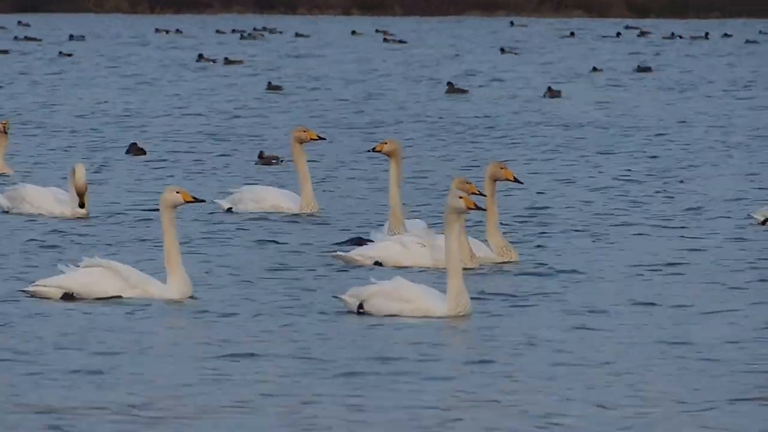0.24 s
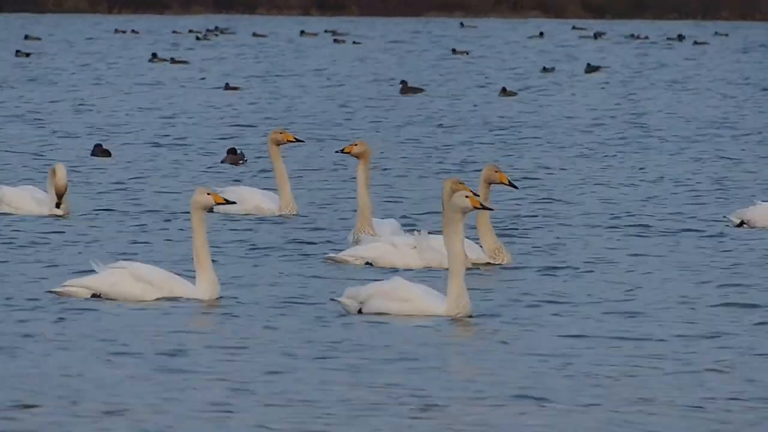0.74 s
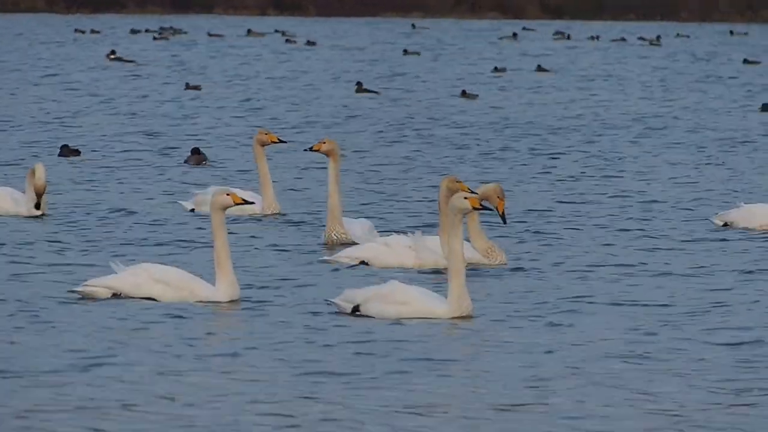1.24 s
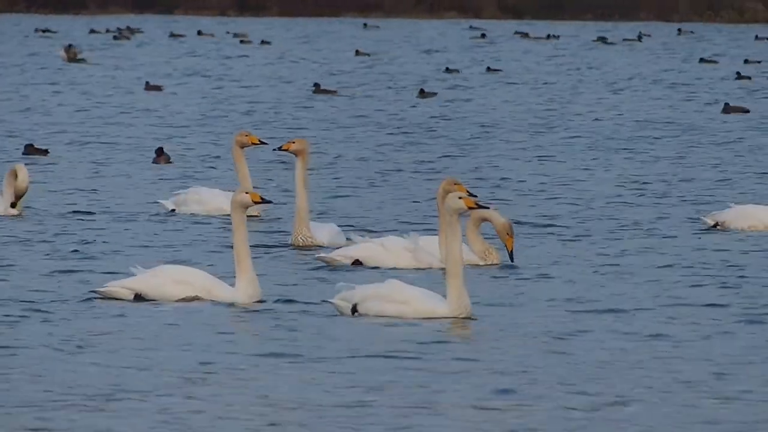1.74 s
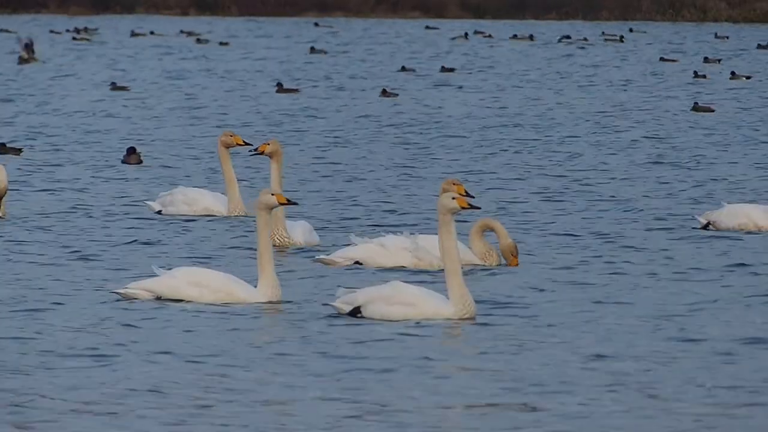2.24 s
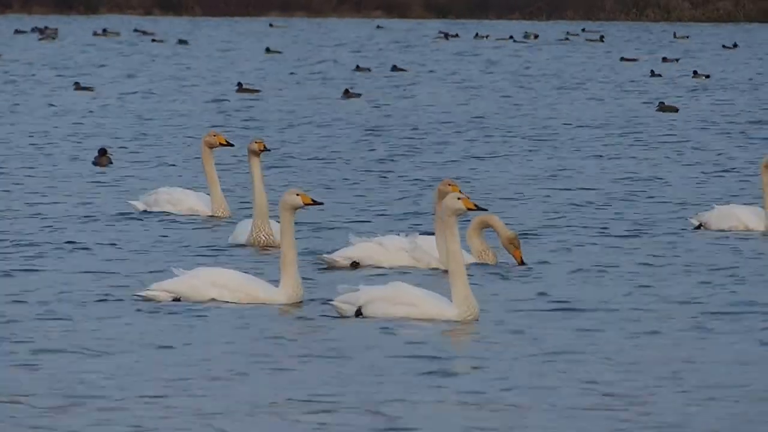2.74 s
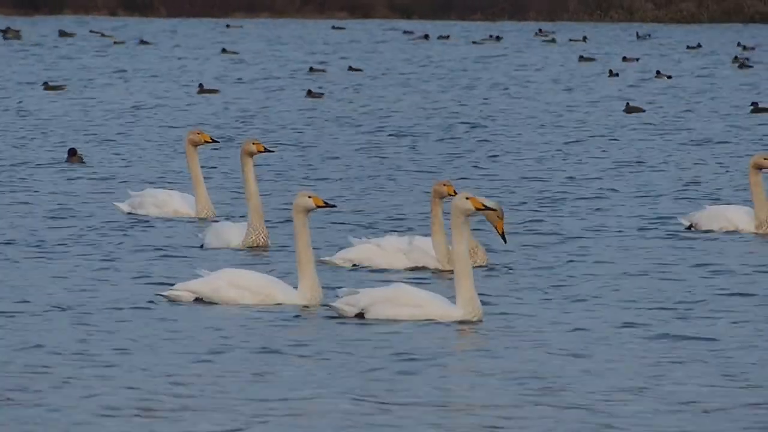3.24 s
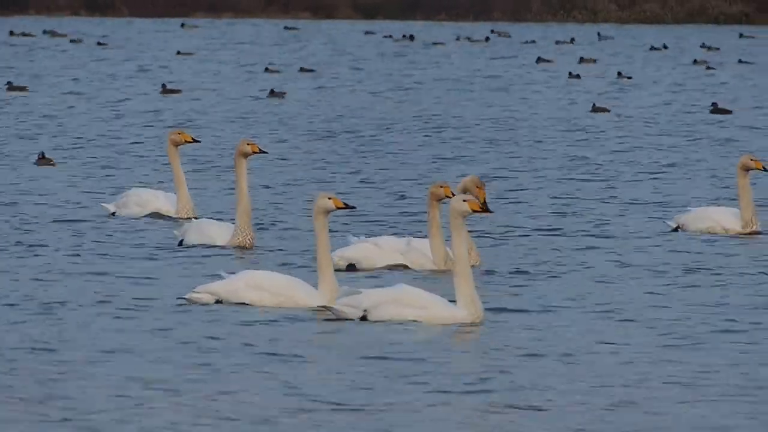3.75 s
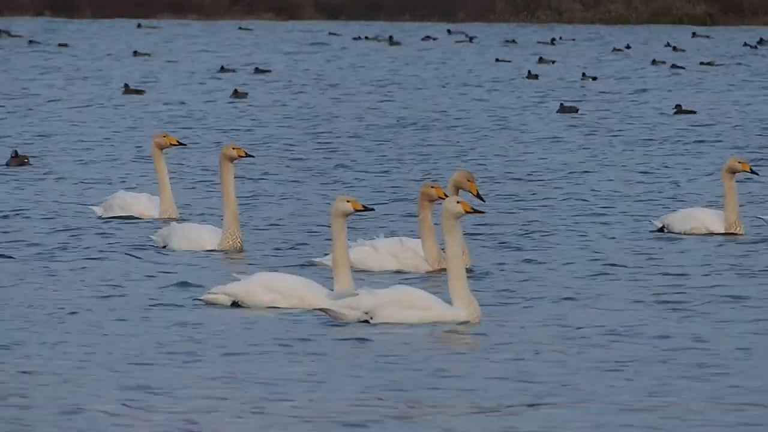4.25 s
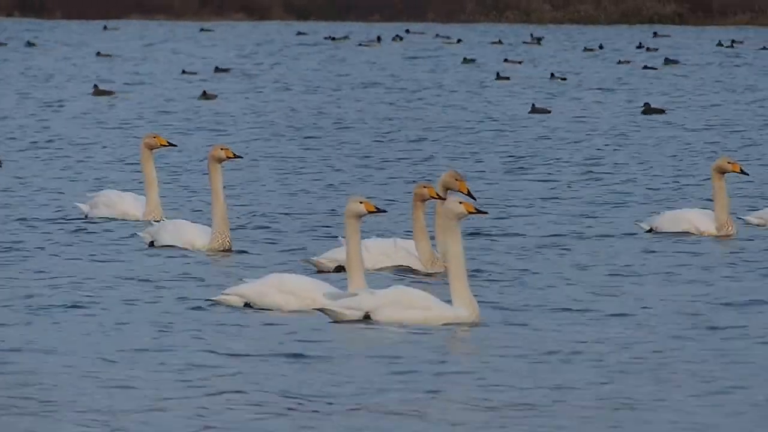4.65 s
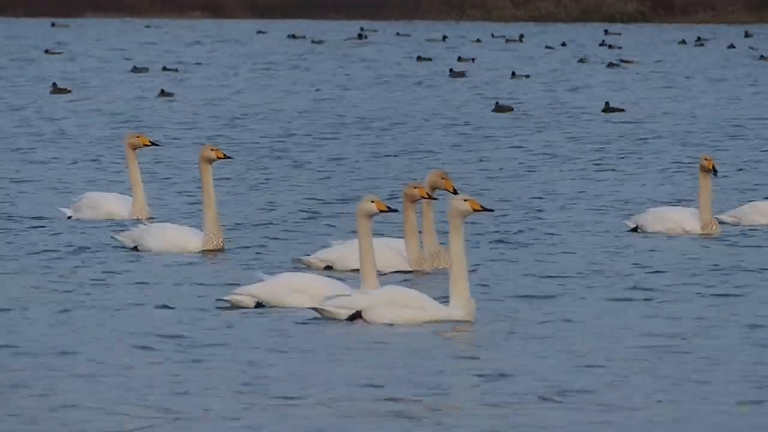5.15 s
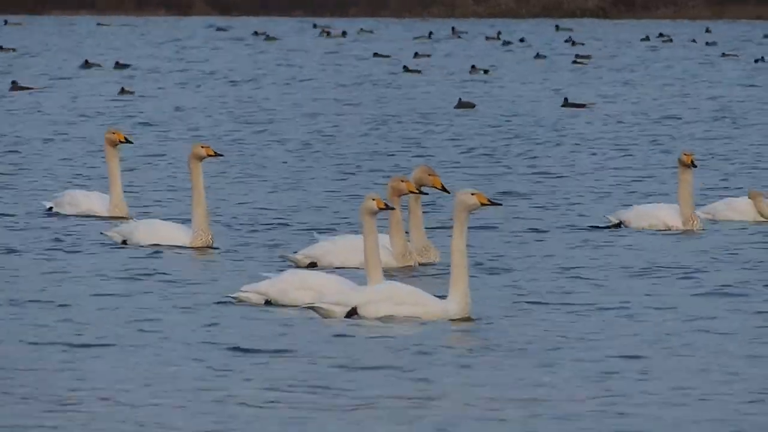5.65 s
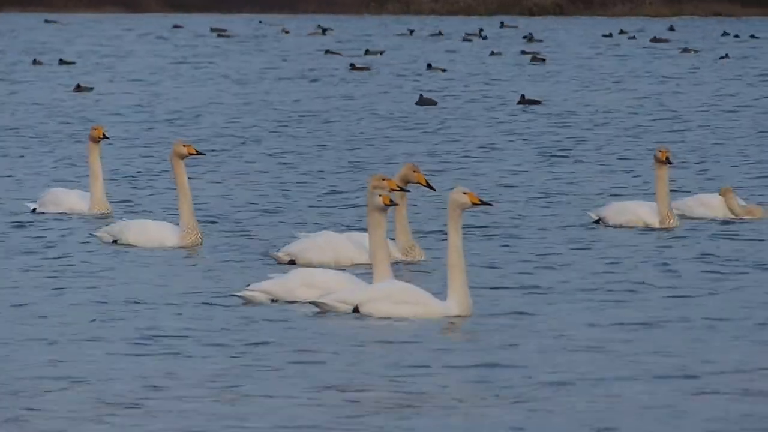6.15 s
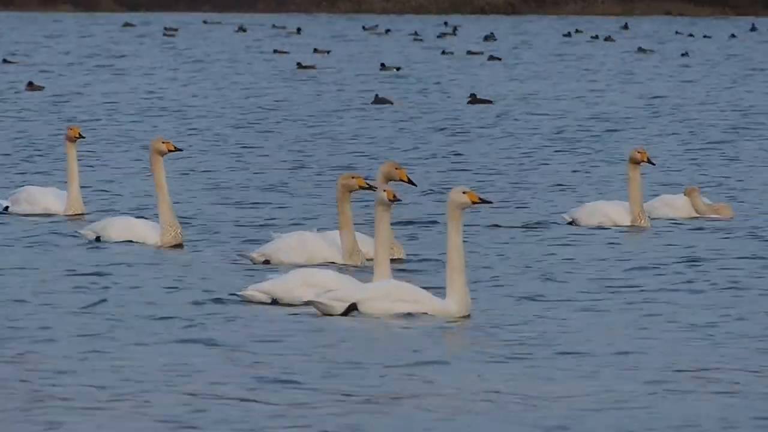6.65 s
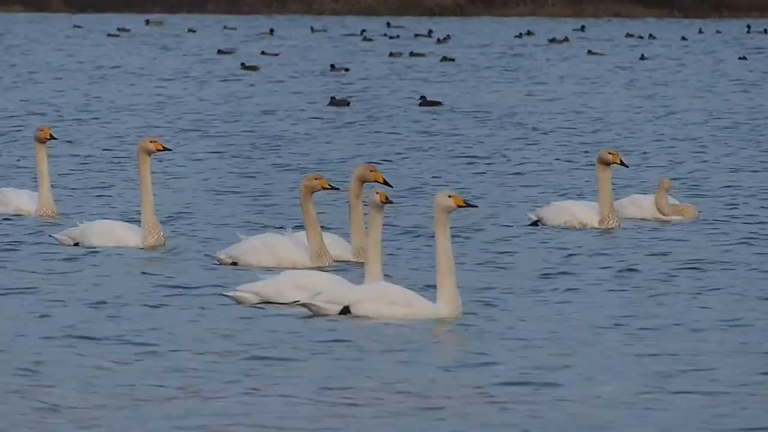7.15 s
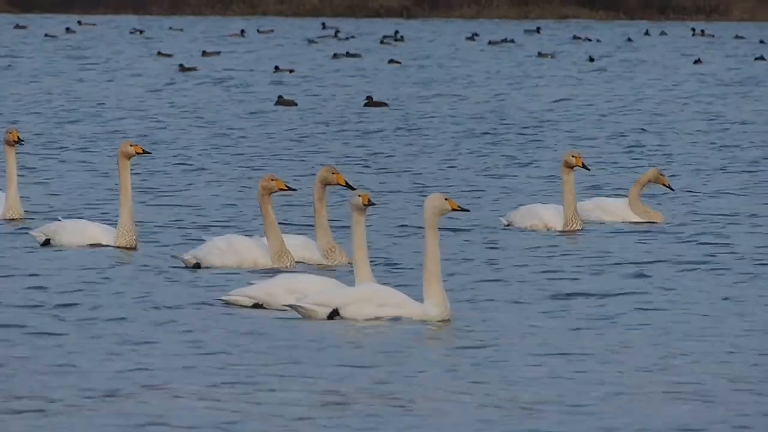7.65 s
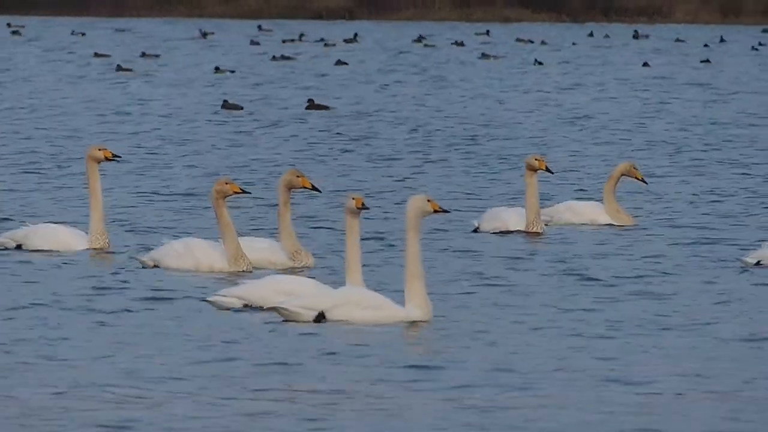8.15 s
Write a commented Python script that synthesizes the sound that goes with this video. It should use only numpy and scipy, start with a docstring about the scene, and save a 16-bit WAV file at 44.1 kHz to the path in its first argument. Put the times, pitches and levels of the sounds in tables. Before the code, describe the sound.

Swans on a lake bugle in overlapping short nasal honks, many cracking upward, with a brief lull near the end over soft wind and water-air hiss.

```python
"""Swans are bugling from the first moment, in overlapping short notes heard from the shore of a lake.
Each note is a stack of overtones: low notes arch, high notes fall, many after cracking in with a rasp.
Far birds murmur behind them as many faint hoarse notes, and the water and banks echo every call.
Shaped noise makes the air over the lake. A light wind, also noise, taps the two microphone ports
in opposition."""
import sys
import numpy as np
from scipy import signal
from scipy.io import wavfile
from scipy.ndimage import uniform_filter1d

SR = 44100
rng = np.random.default_rng(int(sys.argv[2]) if len(sys.argv) > 2 else 0)


def inscribe(sig):
    """Save sig as 16-bit PCM at rate SR to the path in sys.argv[1].

    A 1-D sig is mono; a 2-D sig holds one channel per row.
    Samples are clipped to [-1, 1] before scaling.
    """
    pcm = np.round(np.clip(np.atleast_2d(sig).T, -1, 1) * 32767)
    wavfile.write(sys.argv[1], SR, pcm.astype(np.int16))


N = 369999  # length of the scene in samples

LEFT, AHEAD, RIGHT = 4.6, 1.27, -2.4  # where a bird sits: left level minus right level, dB
# brightness: base level of the bill's ring, dB
BLARING, BRIGHT, PLAIN, SOFT, DULL, MUFFLED = -5.5, -11, -16.5, -22.5, -27, -42
RASPY, HOARSE = 0.015, 0.054  # how long a rough note rasps at its start, s
BREAK_HZ = 760  # above this pitch the voice is in its high register
LOW_GLIDE = 3.76  # a low part slides up this much before its break, %
HIGH_SAG_PER_S = -62  # slide of the high part after a break, % per second
CRACK_SHARE = .36  # the rasp at a break lasts this share of the low part
OVERLAP_S = 0.01033  # the low voice rings on past the break, s
SQUARENESS = 0.56  # power on the swell: under 1 the note starts and stops more abruptly
EDGE_HZ = 15620  # top of the sound band

# Honks that start low and break upward: (start [s], break [s], end [s], low pitch [Hz], high pitch [Hz],
# low level [dB], high level [dB], low brightness [dB], high brightness [dB], place [dB left minus right])
BREAKING_HONKS = [(-.05, 0.048, .1, 639.7, 828, -27.5, -34, DULL, PLAIN, RIGHT),
                  (0.563, 0.644, .693, 701, 955, -34, -35.5, SOFT, PLAIN, RIGHT),
                  (0.82, 0.863, .943, 631, 815, -33.5, -40, SOFT, PLAIN, LEFT),
                  (1.162, 1.197, 1.264, 651, 879.5, -30, -21.5, SOFT, PLAIN, AHEAD),
                  (1.649, 1.751, 1.797, 663, 911, -26.5, -33.5, PLAIN, BLARING, AHEAD),
                  (1.795, 1.852, 1.961, 655.5, 858, -34.5, -27.5, DULL, SOFT, RIGHT),
                  (3.114, 3.151, 3.213, 655, 875.6, -29.5, -23.5, PLAIN, BRIGHT, AHEAD),
                  (3.26, 3.329, 3.378, 646, 876, -26.5, -29, SOFT, BRIGHT, RIGHT),
                  (3.36, 3.439, 3.502, 599, 803, -30, -33, BRIGHT, PLAIN, AHEAD),
                  (3.548, 3.656, 3.737, 618.5, 835, -27.5, -29, PLAIN, PLAIN, AHEAD),
                  (3.944, 3.995, 4.086, 718, 960, -29.5, -35, MUFFLED, BRIGHT, AHEAD),
                  (4.077, 4.199, 4.245, 587, 802, -32.5, -37.5, BLARING, PLAIN, AHEAD),
                  (4.638, 4.729, 4.784, 657.5, 882, -30, -32.5, PLAIN, PLAIN, RIGHT),
                  (4.854, 4.966, 5.022, 638.4, 860, -28, -40, SOFT, PLAIN, AHEAD),
                  (5.262, 5.338, 5.41, 621, 837, -36, -30.5, DULL, DULL, LEFT),
                  (5.444, 5.536, 5.587, 643, 826, -32, -33, MUFFLED, DULL, RIGHT),
                  (5.748, 5.81, 5.92, 641, 859, -28.5, -24.5, PLAIN, PLAIN, AHEAD),
                  (5.876, 5.968, 6.036, 616, 839, -25.5, -29, DULL, SOFT, AHEAD),
                  (6.13, 6.18, 6.252, 637, 870, -25.5, -20.5, SOFT, PLAIN, AHEAD),
                  (6.188, 6.276, 6.318, 595.4, 803, -30.5, -37, PLAIN, SOFT, RIGHT),
                  (6.492, 6.661, 6.702, 658.4, 856, -25, -30.5, PLAIN, BRIGHT, RIGHT),
                  (6.81, 6.857, 6.93, 636, 876, -38.5, -30, BRIGHT, BRIGHT, AHEAD),
                  (7.664, 7.74, 7.797, 653, 877, -36, -42, PLAIN, BRIGHT, LEFT),
                  (7.984, 8.043, 8.186, 649, 860.4, -33.5, -24.5, SOFT, BRIGHT, AHEAD),
                  (8.14, 8.23, 8.296, 643, 870, -27.5, -32, SOFT, BRIGHT, AHEAD)]
# Notes in one register: (start [s], end [s], pitch [Hz], glide [%], level [dB], brightness [dB],
# place [dB left minus right], and for rough notes only: rasp [s])
SINGLE_NOTES = [(-.02, 0.045, 901.6, -5.5, -35, -26, RIGHT), (0.17, 0.25, 545, 12.8, -46, DULL, AHEAD),
                (0.179, 0.269, 795, -5.5, -41.5, -25, LEFT), (0.228, 0.318, 739, 6.5, -36, -59, LEFT),
                (0.257, 0.39, 923.7, -2.2, -28.5, -19.5, AHEAD), (0.64, 0.854, 809, 8.9, -39, -31, LEFT),
                (0.698, 0.832, 650, 1.5, -34.5, -25.5, RIGHT),
                (1.248, 1.4, 652.5, 4.2, -32.5, -19.5, AHEAD),
                (1.29, 1.394, 837, 11.4, -34.5, -29, LEFT, HOARSE),
                (1.296, 1.389, 664, -1.7, -31.5, -26.5, AHEAD),
                (1.366, 1.472, 596, -4.5, -30.5, -17.5, AHEAD, RASPY),
                (1.495, 1.567, 658, -1.5, -31, -22.5, AHEAD, RASPY),
                (1.75, 1.86, 475, 7.9, -47.5, DULL, AHEAD),
                (1.823, 1.91, 802, 2.8, -32.5, -13.5, RIGHT, HOARSE),
                (1.92, 2.025, 653.5, 1, -28.5, -21.5, AHEAD), (1.96, 2.012, 775, 3, -38, DULL, LEFT),
                (1.99, 2.076, 961, -5, -33.5, -8.5, LEFT, HOARSE), (2.0, 2.1, 458, -1.6, -49, DULL, AHEAD),
                (2.245, 2.37, 460, -1.2, -49.5, DULL, AHEAD), (2.009, 2.076, 632, -5, -36.5, -32, AHEAD),
                (2.041, 2.181, 798, 5.2, -38, -22, LEFT),
                (2.25, 2.362, 644, -2.3, -30.5, -24, RIGHT, RASPY),
                (2.353, 2.459, 677, -5.5, -34, -26, AHEAD), (2.548, 2.682, 650.7, 5.2, -33, -18, RIGHT),
                (2.56, 2.695, 890, -7.5, -32.5, -18, AHEAD, HOARSE),
                (2.859, 2.936, 610, 3, -42, -49, RIGHT), (2.909, 3.011, 781, -6, -37, -44, LEFT),
                (2.937, 3.014, 630, 3, -35, -25, RIGHT), (2.992, 3.112, 861.4, -7, -26, -17, AHEAD, RASPY),
                (3.192, 3.284, 652, 6.4, -38.5, -12.5, AHEAD), (3.224, 3.32, 670, 0.71, -36.5, -40, AHEAD),
                (4.321, 4.412, 661, 3.5, -35.5, -22.5, AHEAD), (5.028, 5.058, 815, 2, -45, DULL, LEFT),
                (5.1, 5.168, 570, 15, -48, DULL, AHEAD), (5.092, 5.2, 770, -7.5, -34.5, -31, LEFT),
                (5.151, 5.276, 622, -5.5, -38.5, -25.5, LEFT), (5.18, 5.242, 808, 3.5, -40.5, -32, LEFT),
                (5.393, 5.486, 947, -7, -29, -8.5, LEFT), (5.616, 5.749, 621, -1.95, -29, -18.5, AHEAD),
                (5.845, 5.925, 662, 1.5, -29.5, -13, RIGHT), (5.904, 5.982, 874, -8, -40, -4, AHEAD),
                (6.124, 6.205, 769, -10.5, -33.5, -45, RIGHT),
                (6.229, 6.306, 664, -3.5, -31.5, -12.5, AHEAD),
                (6.576, 6.642, 861, -7.5, -35.5, -11, AHEAD), (6.737, 6.848, 757, -5.5, -33, -53, LEFT),
                (6.902, 6.961, 656, -5, -32, -18, RIGHT), (6.962, 7.012, 780, -2.5, -35, -53, LEFT),
                (6.99, 7.061, 812, -10, -37.5, -67, LEFT),
                (7.304, 7.404, 903, -1.5, -32.5, -16, LEFT, RASPY), (8.022, 8.086, 632, 0, -34, -18, AHEAD),
                (8.224, 8.316, 599.6, 1, -29.5, -14, AHEAD), (8.28, 8.346, 623, 0.45, -25.5, -21, AHEAD),
                (8.309, 8.359, 793, 0.5, -34, -20, LEFT), (8.343, 8.393, 691, -2, -30.5, -25, AHEAD)]
# How strongly the windpipe passes each overtone: (frequency [Hz], level [dB])
WINDPIPE_CURVE = [(950, 6), (1300, -4), (1900, -19), (6000, -62)]
# Ring of the bill, on top of a note's brightness: (frequency [Hz], level [dB])
BILL_CURVE = [(2350, -6.5), (2700, 1.5), (3800, 6), (4700, -4.5), (5500, -1), (9000, -7.5), (15000, -30.5)]
# Tone of the lake noise, shared by both channels: (frequency [Hz], relative density [dB per Hz])
LAKE_CURVE = [(30, -9), (300, 2.5), (700, 2.5), (2200, -7), (11000, -17.5), (15500, -26.5)]
# Tone of the steady wind noise on the ports: (frequency [Hz], relative density [dB per Hz])
PORT_CURVE = [(50, -58), (160, -15.5), (400, -9), (1500, -19), (3000, -33), (15500, -41)]
# Wind puffs, levels before their envelope and the port weights: (time [s], level [dB])
WIND_PUFFS = [(7.167, -41), (7.692, -40)]


def gain_of(db):
    """Turns decibels into a factor."""
    return 10 ** (np.asarray(db) / 20)


def evened(x):
    """Scales to an average strength (rms) of 1."""
    return x / np.sqrt(np.mean(x ** 2) + 1e-20)


def read_curve(points, hz):
    """Reads a curve made of straight lines on a log-frequency axis."""
    f, value = np.transpose(points)
    return np.interp(np.log(hz + 1), np.log(f + 1), value)


def add(mix, start_s, sound):
    """Mixes a sound in at start_s seconds; what falls outside is dropped."""
    at = round(start_s * SR)
    sound = sound[..., max(-at, 0):]
    part = mix[..., max(at, 0):][..., :sound.shape[-1]]
    part += sound[..., :part.shape[-1]]


def placed(sound, pan_db):
    """Seats a sound by the level difference between the two channels."""
    return sound * gain_of([[pan_db / 2], [-pan_db / 2]])


def wobble(count, span_s):
    """Random curve of rms 1, smoothed twice over span_s."""
    size = round(span_s * SR) + 1
    once = uniform_filter1d(rng.standard_normal(count), size)
    return evened(uniform_filter1d(once, size))


def honk(length, hz, glide, db, bright_db, crack_s=0, breaks=False, count=23):
    """Overtones of the syrinx pass windpipe and bill; at first, for crack_s, the membranes beat chaotically."""
    high = hz > BREAK_HZ
    lead = .006  # extra time before and after the note, s
    t = np.arange(-lead, length + lead, 1 / SR)
    v = np.linspace(0, 1, len(t))
    crack = 1 / (1 + (t / (crack_s + 1e-4)) ** 4)  # near 1 in the rasp, then fades
    slow, fast, flutter = (wobble(SR // 4, span_s)[:len(t)] for span_s in (.012, .0007, .009))

    # pitch: both ends droop a little, and some ends droop further
    u = np.clip(t / length - .5, -.6, .6)
    drooping_end = (u > 0) & (not breaks)  # a breaking note does not droop further at its end
    drooping_start = (u < 0) & (not high)  # a high note does not droop further at its start
    bend = 0.0565 * u ** 2 + 0.327 * u ** 4 * (drooping_end | drooping_start)
    travel = abs(u + .5) ** 2.5 - .3 if high else u  # high notes hold their pitch before they slide
    pitch = hz * (1 + glide / 100 * travel - bend)
    jitter = .003 * slow + (.006 + .08 * crack) * fast
    turns = np.cumsum(pitch * (1 + jitter)) / SR

    # loudness: where in the note the swell peaks, as a share of its length
    if high:
        peak = min(0.31 + crack_s / length / 2, .7)  # a longer rasp delays the burst
    else:
        peak = .7 if breaks else .5  # breaking low notes swell late
    arch = abs(np.sin(np.pi * v ** (np.log(.5) / np.log(peak))))
    swell = arch ** SQUARENESS * gain_of(.75 * flutter)  # unsteady breath pressure
    swell *= 1 - .4 * crack  # chaotic beating wastes breath
    # one beat in four is stronger, most in the rasp
    beats = 1 + (.04 + .45 * crack) * np.cos(2 * np.pi * turns / 4 + flutter)

    # overtone levels, worked out every 64 samples
    k = np.arange(1, count + 1)[:, None]
    partial_hz = k * pitch[::64]
    first, last, phase = rng.standard_normal((3, len(k), 1))
    # the moving bill recolours each overtone
    uneven_db = 3.3 * (first * np.cos(2 * v[::64]) + last * np.sin(2 * v[::64]))
    edge_db = 0.76 * (db + 16.0) * (partial_hz > 5000)  # only forceful notes carry treble
    bill_db = bright_db + read_curve(BILL_CURVE, partial_hz) + uneven_db + edge_db
    bill = gain_of(bill_db) * (k > 1)
    # turbulent breath shakes each overtone
    husk = 1 + (.3 + crack[::64] / 2) * rng.standard_normal(bill.shape)
    push = (swell + .25 * crack)[::64]  # louder is brighter
    level = gain_of(read_curve(WINDPIPE_CURVE, partial_hz)) + bill * husk * push
    level *= k * hz < SR / 2.4  # leave out overtones too high to render
    level = np.repeat(level, 64, axis=1)[:, :len(t)]
    voice = (level * np.cos(2 * np.pi * k * turns + 2 * phase)).sum(0)
    return lead, np.sqrt(2) * gain_of(db) * swell * beats * voice


def flock():
    """The near birds: each breaking honk is a low note that flips into a high one."""
    out = np.zeros((2, N))
    # a note's rasp is 0 unless its row gives one
    notes = [(*note[:7], sum(note[7:]), False) for note in SINGLE_NOTES]
    for (s, flip, end, low_hz, high_hz, low_db, high_db,
         low_bright_db, high_bright_db, pan_db) in BREAKING_HONKS:
        sag = HIGH_SAG_PER_S * (end - flip)
        rasp_s = CRACK_SHARE * (flip - s)
        notes.append((s, flip + OVERLAP_S, low_hz, LOW_GLIDE, low_db, low_bright_db, pan_db, 0, True))
        notes.append((flip, end, high_hz, sag, high_db, high_bright_db, pan_db, rasp_s, False))
    for s, end, *voice, pan_db, crack_s, breaks in notes:
        lead, sound = honk(end - s, *voice, crack_s, breaks)
        add(out, s - lead, placed(sound, pan_db))
    return out


def far_flock(count=400):
    """Faint hoarse notes from all over the lake blur into a murmur."""
    out = np.zeros((2, N))
    for when, length, pitch, faintness, side in rng.random((count, 5)):
        length_s, hz, db = 0.03 + 0.06 * length, 500 + 480 * pitch, -55 - 8 * faintness
        _, sound = honk(length_s, hz, -3.15, db, -48, crack_s=.06, count=5)
        add(out, when * N / SR, placed(sound, 12 * (side - .5)))
    return out


def banks(x):
    """One slap from the near bank, then sparse taps that die away, the treble soonest."""
    shape = (2, SR // 2)
    taps = rng.choice([-1., 1.], shape) * (rng.random(shape) < .05)
    hz, t, z = signal.stft(taps, SR, nperseg=256)
    fade_s = read_curve([(600, 0.61), (5000, 0.45)], hz)[:, None]  # time to fall by 60 dB
    fading = z * (t > .02) * gain_of(-60 * t / fade_s)
    tail = signal.istft(fading, SR, nperseg=256)[1]
    tail *= gain_of(-17.5) / np.linalg.norm(tail[0])
    tail[:, round(.07 * SR)] += gain_of(-19)  # the slap
    return signal.fftconvolve(x, tail, axes=1)[:, :N]


def noise(points, patchy_db):
    """Noise of rms 1 from random short-time spectra, with drifting louder and softer patches."""
    frames, hz = N // 256 + 5, np.fft.rfftfreq(1024, 1 / SR)
    a, b, patches = rng.standard_normal((frames, 513, 3)).T
    patches = uniform_filter1d(patches, size=10, axis=0)  # smooth across frequency
    patches = evened(uniform_filter1d(patches, size=14, axis=1))  # and across time
    z = (a + 1j * b) * gain_of(read_curve(points, hz)[:, None] + patchy_db * patches)
    return evened(signal.istft(z, nperseg=1024, noverlap=768)[1][:N])


def lake_air():
    """Soft noise over the lake, the same in both channels."""
    return gain_of(-54.0) * noise(LAKE_CURVE, patchy_db=3.0)


def wind():
    """Steady pressure noise and short low puffs, opposite in the two ports."""
    out = gain_of(-51.5) * noise(PORT_CURVE, patchy_db=6.0)
    rise = np.arange(4000) / SR / 0.02  # each puff peaks after 0.02 s
    low_band = signal.butter(2, (110, 380), "band", fs=SR, output="sos")
    for s, db in WIND_PUFFS:
        puff = signal.sosfilt(low_band, rng.standard_normal(4000))
        add(out, s - .005, gain_of(db) * evened(puff) * rise * np.exp(1 - rise))
    return out * np.array([[1.2], [-.8]])  # opposite signs, stronger on the left


def scene():
    """Adds up birds, echoes, lake noise and wind."""
    birds = flock() + far_flock()
    no_bass = signal.butter(6, 420, "high", fs=SR, output="sos")
    birds = signal.sosfilt(no_bass, birds)  # the windpipe radiates no bass
    return birds + banks(birds) + lake_air() + wind()


def record(dry):
    """A small steady offset from the converter, then the band limit."""
    padded = np.pad(dry - .007, ((0, 0), (255, 255)), "edge")
    low_pass = signal.firwin(511, EDGE_HZ, window=("kaiser", 9), fs=SR)
    return signal.oaconvolve(padded, low_pass[None], "valid", axes=1)


dry = scene()
out = record(dry)
inscribe(out)
```